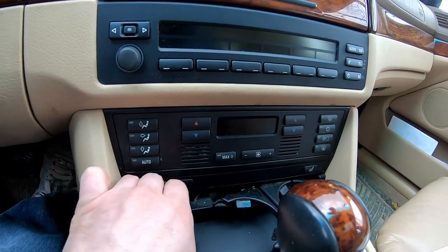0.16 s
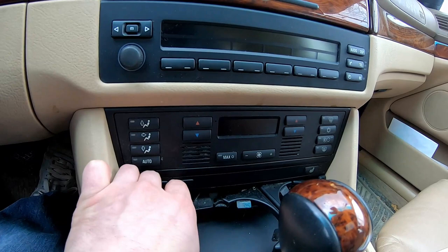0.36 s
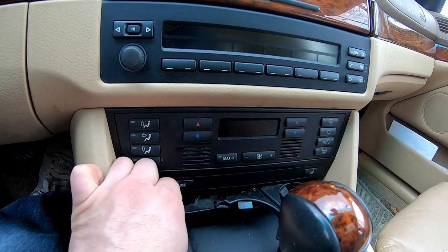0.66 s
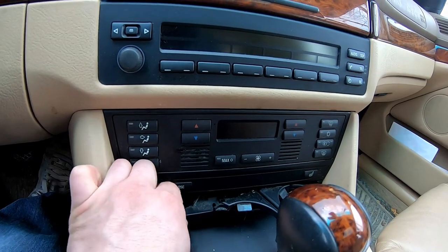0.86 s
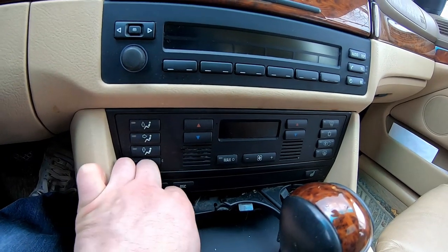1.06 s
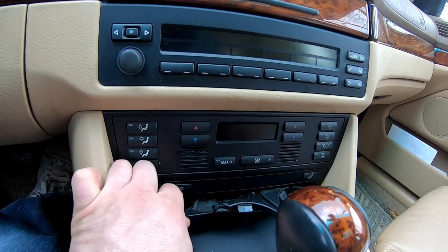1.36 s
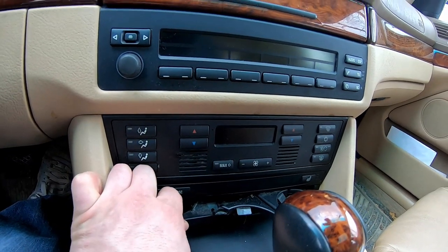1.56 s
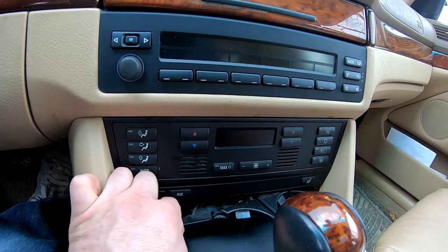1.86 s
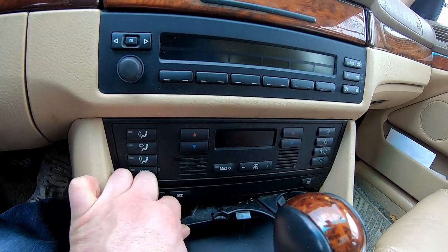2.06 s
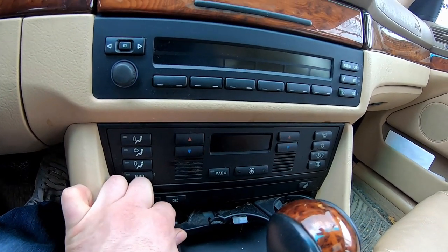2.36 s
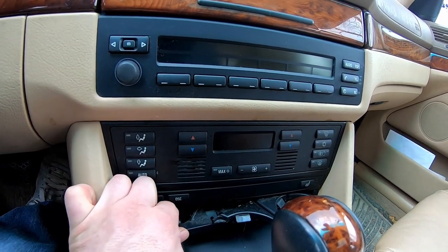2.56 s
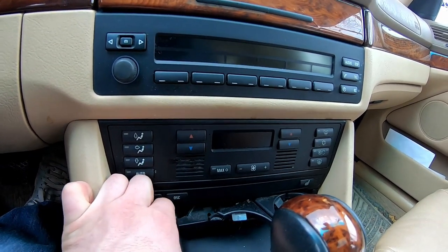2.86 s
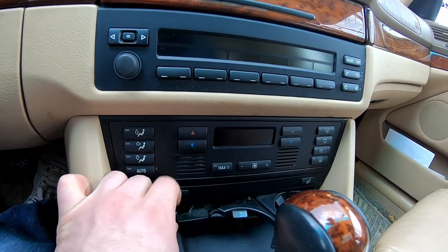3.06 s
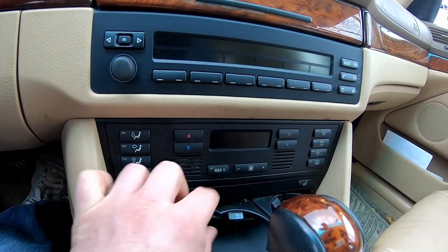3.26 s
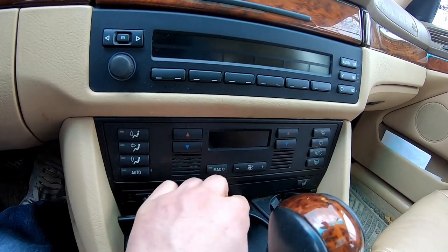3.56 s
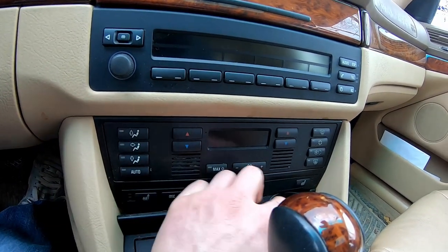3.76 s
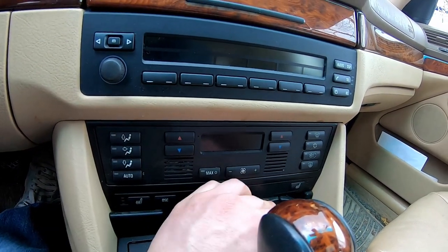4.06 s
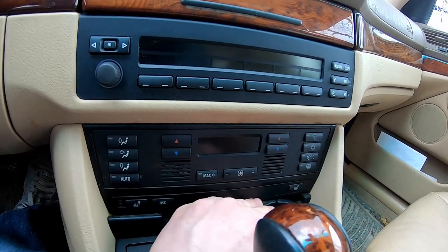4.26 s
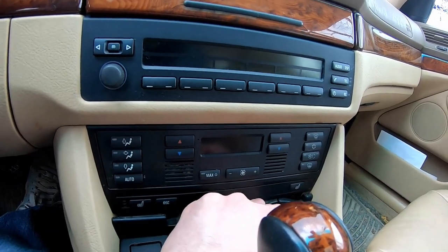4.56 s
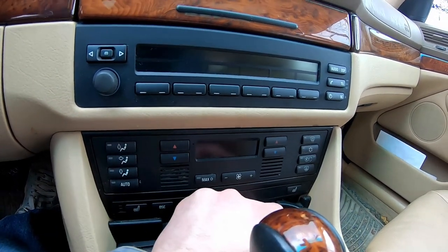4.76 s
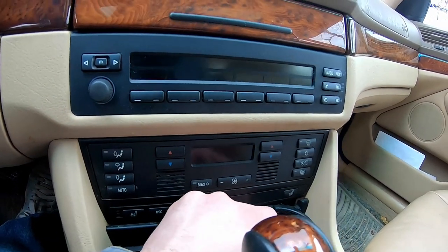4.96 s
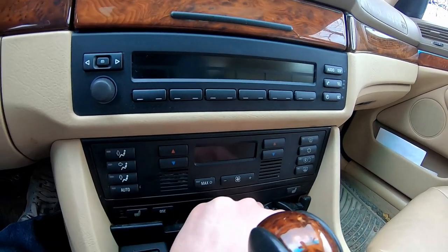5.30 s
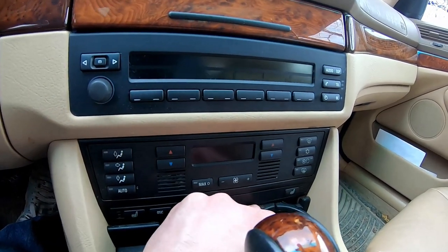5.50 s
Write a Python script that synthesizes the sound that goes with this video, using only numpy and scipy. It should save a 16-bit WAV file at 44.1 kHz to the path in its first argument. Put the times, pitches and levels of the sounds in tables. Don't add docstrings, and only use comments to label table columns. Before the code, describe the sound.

Inside a quiet parked car, a hand works a stiff plastic console panel loose. Sharp cracks come at about 0.7, 2, 2.9 and 4.4 seconds, with smaller clicks, scrapes and hollow low knocks between. Skin rubs softly on textured plastic, strongest from about 3 seconds. A small handheld camera half a metre away picks up everything close and dry, with low handling rumble.

```python
import sys
import numpy as np
from scipy import signal
from scipy.fft import rfft, irfft, next_fast_len
from scipy.io import wavfile
from scipy.ndimage import uniform_filter1d

SR = 44100
rng = np.random.default_rng(int(sys.argv[2]) if len(sys.argv) > 2 else 0)


def waveform_to_disk(signal):
    frames = np.transpose(np.atleast_2d(signal))
    scaled = np.clip(frames, -1, 1) * 32767
    samples = np.round(scaled).astype(np.int16)
    wavfile.write(sys.argv[1], SR, samples)


def volts_from_db(level):
    exponent = np.asarray(level, float) / 20
    return 10 ** exponent


N = 248503

# t/s, pressure as rub level/dB, slide speed as hiss level/dB re rub
RUBBING = [(0.0, -56, -18), (0.14, -62.5, -23), (0.66, -56.5, -18), (0.922, -69, -12), (1.471, -71.5, -7),
           (1.8, -71.5, -11.5), (2.039, -56.5, -28), (2.15, -69.5, -14), (2.791, -79.5, -2),
           (3.0, -63.5, -17.5), (3.37, -65.5, -7.5), (3.64, -55.5, -7.5), (4.2, -60, -8),
           (4.309, -67.5, -12.5), (5.06, -63.5, -10), (5.3, -61.5, -13.5), (5.44, -64.5, -10),
           (5.56, -61.5, -13.5)]
# f/Hz, level/dB per Hz
RUB_COLOUR = [(250, -39.5), (420, -1), (600, -8.5), (936, -1.5), (1020, -9), (1290, -2.5), (1890, -6),
              (2550, -5.5), (3600, -7), (5300, -15), (6500, -32.5), (13200, -69.5)]
HISS_COLOUR = [(3060, -26), (5200, -4), (7340, -4.5), (8360, -0.5), (9790, -9), (10600, -13),
               (14700, -25.5), (15800, -33.5)]
# f/Hz, level/dB re sum
RUB_SPREAD = [(60, -16), (110, -15), (200, -22.5), (380, -11), (700, -4), (1290, -5.5), (2380, -5),
              (3400, -11.5), (5000, -2.5), (8120, -2), (15000, -1.5)]
# t/s, rumble level/dB
JOLTS = [(0.12, -50), (0.4, -55), (0.73, -36), (1.04, -51), (1.17, -50), (1.601, -64), (2.025, -33.5),
         (2.28, -56.5), (2.38, -54.5), (2.96, -33), (3.15, -50), (3.55, -41), (3.65, -54), (3.82, -52),
         (3.89, -49), (4.0, -46), (4.16, -42.5), (4.42, -44), (4.75, -55), (4.89, -42), (5.28, -50),
         (5.55, -56.5)]
# f/Hz, level/dB per Hz
PORT_NOISE_COLOUR = [(25, -3.5), (70, -11), (100, -18.5), (200, -11.5), (400, -23), (800, -17.5),
                     (3300, -40.5), (8000, -37.5)]
# f/Hz, level/dB, t60/s
BODY = [(360, -4, 0.026), (491, -7, 0.041), (559.5, -3, 0.017), (777, -0.5, 0.03), (933.5, -2, 0.034),
        (1153, 0.5, 0.029), (1300, 0.5, 0.028)]
FACE = [(1520, -1, 0.0089), (1860, -8, 0.018), (1974, -1, 0.012), (2640, -2, 0.013), (2814, -8.5, 0.02),
        (3284, 2.5, 0.0065), (3422, 2.5, 0.0098), (3620, -2, 0.011), (4130, 1, 0.0087), (5000, -6, 0.0072),
        (5560, -6.5, 0.0038)]
EDGE = [(5680, 0.5, 0.0021), (6800, -6, 0.003), (7020, -1, 0.0078), (7470, -3, 0.0077), (8210, -5.5, 0.02),
        (8614, -7.5, 0.013), (9440, -5, 0.0019), (13100, -31.5, .003)]
# peak t/s, peak level/dB, body level/dB re peak, edge level/dB re peak, length/s
SCRAPES = [(0.008, -33, -5, -16.5, .011), (0.084, -41, -4.5, -37, .018), (0.669, -19.5, -10, -14, .04),
           (0.686, -29.5, -13, -1, .02), (0.712, -34, 6.5, -12.5, 0.032), (1.177, -41, -14, -1, .011),
           (1.856, -36, -16, -8, .035), (2.0, -34, -17, -8, .011), (2.93, -28, 4, -7, .028),
           (3.148, -42, -5, 7.5, .045), (3.187, -41, -5, -56, 0.022), (3.297, -33, -4.5, 3, .026),
           (3.518, -24.5, 4, -16, .022), (3.53, -18.5, -6.5, -15, .021), (3.785, -37.5, -11, -2, .02),
           (4.122, -15, -2.5, -12, .014), (4.162, -26.5, -6, -11.5, .015), (4.873, -30.5, 3, -11, .024),
           (5.26, -26, -7.5, -3.5, .02), (5.33, -39, 2, -4.5, 0.032), (5.428, -35, -1, -11, .037),
           (5.3, -39.5, -3.5, -0.5, .025), (5.52, -39, -1, -3, .018)]
# peak t/s, peak level/dB, brightness/dB edge over body, length/s
BRUSHES = [(0.18, -40, -13, 0.017), (0.291, -43.5, -22, 0.013), (0.383, -44.5, -7.5, .02),
           (0.743, -47, 5, 0.014), (0.798, -44.5, -16, 0.036), (1.025, -46, 10, 0.035),
           (1.138, -48, 12, 0.014), (1.431, -52.5, 1.5, .025), (1.546, -51.5, 5.5, 0.046),
           (1.733, -53, -0.5, 0.04), (1.953, -45, -36, 0.028), (1.971, -40, -27, 0.0099),
           (2.634, -59, 12.5, 0.072), (2.692, -65, 13.5, .06), (2.997, -40.5, 0, 0.014),
           (3.127, -39, 1, .022), (3.177, -38.5, 3.5, .021), (3.83, -49, 7, 0.026), (4.05, -51.5, -26, .06),
           (4.233, -47.5, 10.5, .015), (4.328, -44, 2, 0.025), (4.374, -35, -8, 0.01),
           (5.221, -44, -35, 0.017), (5.337, -49, -5, 0.006), (5.472, -40, -29, 0.014)]
# middle t/s, rms level/dB, colour f/Hz, length/s
STROKES = [(0.112, -59, 2500, 0.047), (0.43, -62, 3520, 0.057), (0.535, -62, 3270, 0.13),
           (0.698, -48, 3020, 0.11), (1.3, -66.5, 6000, 0.057), (1.416, -68.5, 8400, 0.2),
           (1.542, -69, 8300, 0.13), (1.75, -70.5, 8300, 0.12), (2.028, -57, 2520, 0.086),
           (2.154, -63.5, 3320, 0.077), (2.27, -64.5, 2500, 0.046), (2.66, -69, 7980, .16),
           (2.897, -59, 3000, 0.05), (2.951, -60, 1480, .08), (3.007, -58, 1180, 0.052),
           (3.169, -53, 1470, 0.16), (3.171, -50.5, 4200, 0.096), (3.293, -45.5, 1560, 0.051),
           (3.434, -58.5, 2440, 0.13), (3.6, -56, 2200, 0.12), (3.843, -53.5, 2840, 0.1),
           (3.957, -53.5, 3470, 0.086), (4.029, -62, 1010, 0.13), (5.323, -48, 3500, 0.058),
           (5.444, -45.5, 850, 0.079), (5.511, -55, 2570, 0.069), (5.601, -52, 2320, .14)]
# middle t/s, rms level/dB, colour f/Hz, length/s
DRAGS = [(0.1, -55, 226, 0.064), (0.24, -52, 220, 0.084), (0.44, -56, 222, 0.075), (1.029, -51, 249, 0.084),
         (2.17, -49, 225, .14), (2.472, -66, 199, .1), (3.65, -48, 225, .12), (3.85, -49, 227, 0.13),
         (4.05, -56, 196, .1), (5.15, -61, 222, 0.15), (5.601, -67, 236, 0.088), (1.45, -74, 10970, 0.29),
         (3.299, -53, 11380, 0.09), (5.541, -54, 1730, .1), (4.795, -58.5, 2600, .09),
         (0.666, -37, 4200, .04)]
# t/s, peak level/dB, body level/dB re peak, edge level/dB re peak
SNAPS = [(0.187, -29, 0.5, -17), (0.471, -35, -0.5, -25), (0.726, -19, -14, -14), (1.1255, -25.5, -13, -27),
         (1.9823, -9, -1, -26.5), (2.012, -23, -66.5, -2.5), (2.039, -24, 0, -11), (2.053, -34, 3, -11),
         (2.06, -27, -25, -16), (2.311, -32.5, -19, -12), (2.9857, -29, -5, -1), (3.131, -22, -5, -12),
         (3.4859, -28, -4, -6), (3.6913, -31.5, -2, -23), (4.081, -26, -1, -14), (4.1399, -26.5, -24, -5),
         (4.1506, -24.5, -5, -16), (4.1987, -25, -4, -13), (4.382, -11.5, -14, -8.5),
         (4.4173, -21, 0.5, -12.5), (4.747, -22, -7.5, -6), (4.859, -26.5, 4, -12), (5.1007, -37, -21, 1),
         (5.4118, -25.5, 0, -12), (3.7733, -35, -30, -1.5), (5.2314, -24.5, -14, -0.5),
         (5.4917, -32, 0.5, -7)]
# t/s, peak level/dB, body level/dB re peak, edge level/dB re peak
CRACKS = [(0.087, -31.5, 2, -21), (0.6716, -8.5, -7, -20.5), (0.6735, -3.5, -12.5, -11),
          (1.168, -31, -37, -15), (1.1861, -32, -21, -50), (1.1959, -40, 3.5, -15),
          (1.8345, -16.5, -31.5, -0.5), (2.387, -40, -25, -13), (2.9107, -11.5, -2.5, -10.5),
          (2.9536, -22.5, -5, -10), (3.565, -22, -1.5, -6), (4.322, -39.5, -0.5, -10),
          (4.912, -38.5, -4, -6), (5.241, -24.5, 8, -23)]
# t/s, peak level/dB, brightness/dB edge over body
TICKS = [(0.166, -48, -17), (0.328, -40.5, -6), (0.896, -47.5, -3), (1.01, -42.5, 7.5), (1.051, -42, -1),
         (1.104, -40, -13), (1.241, -45, -32), (1.565, -43, -61), (1.717, -44.5, -24), (1.937, -39, -4),
         (2.234, -52.5, -11), (2.358, -48.5, -55), (3.278, -37, 0), (2.468, -50, -0.5), (2.61, -47, -1),
         (4.573, -48.5, -7), (4.991, -43.5, -17), (5.072, -49.5, -23)]
# t/s, peak level/dB, f/Hz, decay/s
PINGS = [(0.089, -44.5, 895, 0.0036), (0.187, -34.5, 1520, 0.0055), (0.292, -42, 2480, 0.0047),
         (0.329, -49, 1280, .008), (0.369, -50, 2360, .004), (0.381, -47.5, 1440, .005),
         (0.471, -43.5, 1550, 0.0036), (0.725, -31, 865, 0.0055), (0.78, -50, 750, 0.0049),
         (1.565, -48, 1150, 0.0055), (1.533, -57, 1237, 0.0072), (1.716, -46, 1390, 0.0052),
         (2.055, -28.5, 1242, 0.006), (2.234, -56, 1890, 0.0054), (2.245, -55, 1360, .006),
         (2.311, -44.5, 1200, 0.0061), (2.387, -54, 2090, 0.0043), (2.441, -53, 2140, 0.0056),
         (2.469, -59, 1242, 0.0051), (2.872, -64, 883, 0.015), (2.95, -36.5, 524, 0.0072),
         (2.992, -40, 2700, 0.003), (3.127, -35, 1700, 0.007), (3.487, -38, 4020, 0.0045),
         (3.688, -39, 1255, 0.0036), (3.698, -40, 3770, 0.0031), (3.774, -38.5, 4580, 0.0034),
         (3.832, -42, 938, 0.013), (4.012, -47, 910, 0.013), (4.039, -43, 3460, 0.0074),
         (4.068, -43, 1280, .005), (4.553, -64, 754, 0.0052), (4.729, -50, 1740, 0.0088),
         (4.966, -51.5, 924, 0.0055), (5.23, -33, 3430, 0.0054), (5.275, -46, 844, 0.0079),
         (5.303, -37.5, 850, 0.0064), (5.319, -37, 837, 0.007), (5.418, -32, 880, 0.004),
         (5.466, -51, 3570, 0.0035), (5.492, -41.5, 2590, .008), (5.553, -48, 2520, 0.0046)]
# t/s, peak level/dB, f/Hz, decay/s
STRIKES = [(0.6722, -15, 1720, 0.003), (0.674, -12, 3330, 0.0038), (0.709, -36, 1250, .004),
           (0.7265, -19.5, 2270, 0.0025), (1.1252, -38, 3060, 0.0023), (1.17, -33.5, 2170, .004),
           (1.187, -32, 2250, 0.0026), (1.9825, -10.5, 3720, 0.001), (1.983, -22, 4740, 0.0016),
           (1.985, -14.5, 1120, 0.0041), (2.0132, -30, 5000, 0.0018), (2.0394, -24, 4200, .002),
           (2.04, -35, 1290, .004), (2.054, -34.5, 1290, 0.0069), (4.151, -23, 3200, .005),
           (2.9104, -13.5, 3600, 0.0031), (2.912, -27, 1170, 0.0033), (2.914, -19.5, 2340, 0.0028),
           (2.913, -25.5, 530, 0.0068), (2.9865, -22.5, 5140, 0.0022), (4.121, -22, 707, 0.0061),
           (4.123, -17, 3400, 0.002), (4.159, -20.5, 1220, 0.0025), (4.383, -17, 1890, 0.0051),
           (4.386, -17, 3320, 0.0024), (4.385, -20.5, 980, 0.0045), (5.1017, -36, 3380, 0.0025),
           (5.243, -20.5, 3500, 0.0016), (5.246, -30.5, 1200, 0.0047), (5.256, -35, 2500, .006)]
# t/s, peak level/dB, pitch f/Hz, deep cavity level/dB re peak
BOOMS = [(0.092, -37.5, 212, -16), (0.185, -39, 242, -5), (0.386, -42.5, 216, -8), (0.564, -38.5, 208, -3),
         (0.669, -26, 300, -2), (0.6876, -13, 241.3, -11), (0.71, -26.5, 199, -8), (0.743, -37, 196, -4),
         (1.128, -37, 200, -4), (1.196, -43, 280, -12), (1.572, -41, 230, -15.5), (1.842, -44.5, 237, -34),
         (1.985, -21, 227, -9), (2.003, -28, 197, -4.5), (2.049, -37.5, 233, -5.5), (2.91, -25, 269, -22),
         (2.94, -28.5, 227, -12), (2.991, -35, 232, -2), (3.13, -37, 235, -12), (3.479, -42.5, 180, -7),
         (3.537, -30, 249, -31), (3.786, -42.5, 238, -15), (4.119, -24.5, 203, -5), (4.168, -32.5, 233, -4),
         (4.387, -39, 235, -1.5), (4.753, -34.5, 256, -25), (4.868, -36, 229, -12), (5.245, -31, 220, -9),
         (5.343, -41, 200, -11), (5.47, -42, 218, -38)]
# t/s, peak level/dB, pitch f/Hz, deep cavity level/dB re peak
KNOCKS = [
    (1.5638, -37.5, 616, -27.5),
    (2.125, -41, 380, -1),
    (2.346, -49, 398, -26),
]
# t/s, peak level/dB
NUDGES = [(0.291, -49), (0.501, -44.5), (0.994, -51.5), (1.267, -49), (1.709, -50), (2.188, -50.5),
          (2.388, -54.5), (2.624, -57), (3.3, -47), (3.62, -41), (3.902, -64), (4.053, -47), (4.469, -51),
          (2.721, -68.5), (5.09, -48)]
# start t/s, end t/s, rms level/dB
BUZZES = [
    (0.708, 0.734, -57),
    (2.039, 2.121, -51.5),
    (2.135, 2.181, -60.5),
]
# f/Hz, level/dB, t60/s
CATCH_MODES = [(680, -8, 0.014), (1150, -5, 0.016), (1300, -8.5, 0.028)]
# f/Hz, level/dB re sum
BLOW_SPREAD = [(60, -17.5), (110, -23.5), (200, -34), (380, -16), (700, -7.5), (1290, -7), (2380, -5),
               (3400, -10.5), (5000, -4.5), (8120, 1), (15000, -2)]

TOP_HZ = 15800


def shaped(points, size):
    hz, value = np.transpose(points)
    return np.interp(np.log(np.fft.rfftfreq(size, 1 / SR) + 1), np.log(hz), value)


def colour(x, points):
    size = next_fast_len(N)
    return irfft(rfft(x, size) * volts_from_db(shaped(points, size)), size)[..., :N]


def band(x, lo_hz, hi_hz):
    return signal.sosfilt(signal.butter(2, [lo_hz, hi_hz], "bandpass", fs=SR, output="sos"), x)


def unit(x):
    return x / np.sqrt(np.mean(x ** 2))


def walk(rate):
    hold = int(SR / rate)
    levels = rng.standard_normal(N // hold + 1)
    return uniform_filter1d(np.repeat(levels, hold), hold)[:N]


def add(out, s, sound):
    i = max(int(s * SR), 0)
    out[i:i + len(sound)] += sound[:N - i]


def friction(surface, rate, grain_db, flicker_db, split_hz):
    sizes = volts_from_db(grain_db * np.minimum(rng.exponential(size=N), 3.5))
    ticks = (rng.random(N) < rate / SR) * sizes * rng.standard_normal(N)
    raw = 0.32 * unit(ticks) + rng.standard_normal((2, N))
    both = np.array([colour(v, surface) for v in raw])
    dull = signal.sosfilt(signal.butter(1, split_hz, fs=SR, output="sos"), both)
    bright = both - dull
    return unit(dull * volts_from_db(flicker_db * walk(30)) + bright * volts_from_db(flicker_db * walk(45)))


def console_hum(rub_db, slide_db):
    hum_db = rub_db - 4 - 0.4 * slide_db
    noise = band(band(rng.standard_normal((2, N)), 140, 300), 120, 310)
    return unit(noise) * volts_from_db(hum_db + 4.0 + 1.9 * walk(12))


def rubbing():
    s, *columns = np.transpose(RUBBING)
    t = np.arange(N) / SR
    rub_db, slide_db = (np.interp(t, s, c) for c in columns)
    rub = friction(RUB_COLOUR, rate=4700.0, grain_db=3.5, flicker_db=3.0, split_hz=1200)
    hiss = friction(HISS_COLOUR, rate=2100.0, grain_db=6.0, flicker_db=3.5, split_hz=11000)
    rub = rub * volts_from_db(rub_db + 3.5)
    hiss = hiss * volts_from_db(rub_db + slide_db + 7.5)
    mid, side = rub + hiss + console_hum(rub_db, slide_db)
    return np.array([mid, colour(side, RUB_SPREAD)])


def camera_rumble():
    t = np.arange(N) / SR
    rise_db_s, fall_db_s, still_db = 245.5, 173.5, -71
    jolts_db = [db - np.maximum(rise_db_s * (at - t), fall_db_s * (t - at)) for at, db in JOLTS]
    rumble_db = np.max(jolts_db, axis=0).clip(still_db)
    sway = band(band(rng.standard_normal(N), 26, 80), 26, 76)
    steady = unit(sway / uniform_filter1d(np.abs(sway), size=1800))
    rumble = steady * volts_from_db(rumble_db - 0.5)
    shake = 0.05 * np.roll(rumble, 1500)
    return np.array([rumble, shake])


def port_noise():
    noise = unit(colour(rng.standard_normal(N), PORT_NOISE_COLOUR))
    return volts_from_db(-69 + 3.0 * walk(8)) * noise


def ring(modes, t, luck, tilt_db=0., scatter_db=2.5, detune=0.043, crack=1.9):
    hz, db, t60 = np.transpose(modes)[:, :, None]
    share, shift = luck[:2 * len(modes)].reshape(2, -1, 1)
    db = db + scatter_db * share + tilt_db * np.log2(hz / np.median(hz))
    decay = np.exp(-np.log(1000) * t / t60)
    sign = (-1.) ** np.arange(len(modes))[:, None]
    tone = np.sin(2 * np.pi * hz * (1 + detune * shift) * t)
    return np.sum(sign * volts_from_db(db) * (decay + crack * decay ** 4) * tone, axis=0)


def panel(out, s, push, levels_db, luck, air_db):
    t = np.arange(2048) / SR
    body_db, face_db, edge_db = levels_db
    hardness = edge_db - body_db + 11.5
    for modes, db, chance, sign in zip((BODY, FACE, EDGE), levels_db, luck, (1, -1, 1)):
        sound = signal.fftconvolve(push, ring(modes, t, chance, tilt_db=0.24 * hardness))
        add(out, s, sign * volts_from_db(db) * sound / np.abs(sound).max())
    contact = band(band(push, 1250, 5000), 900, 7400)
    add(out, s, volts_from_db(face_db - 2.5) * contact / np.abs(contact).max())
    air = band(push, 3300, 14000)
    add(out, s, volts_from_db(edge_db + air_db) * air / np.abs(air).max())


def faint(s, db, bright_db, *rest):
    return (s, db, -3 - 0.2 * bright_db, -4 + bright_db, *rest)


def scrapes():
    out, t = np.zeros(N), np.arange(5000) / SR
    for s, db, body_db, edge_db, length in SCRAPES + [faint(*row) for row in BRUSHES]:
        luck = 1.43 * rng.standard_normal((3, 36))
        slips = rng.random(len(t)) < 1800 / SR
        rise = np.clip(0.75 * length, .003, min(s, .04))
        fade = np.clip(0.38 * length, .002, .025)
        force = np.where(t < rise, (t / rise) ** 1.6, np.exp(-(t - rise) / fade))
        push = force * rng.standard_normal(len(t)) * (slips + 0.33)
        panel(out, s - rise, push, db + np.array([body_db, 0, edge_db]), luck, air_db=-6.5)
    return out


def strokes():
    out = np.zeros(N)
    octaves = 0.48
    for s, db, hz, length in STROKES + DRAGS:
        noise, grain = rng.standard_normal((2, 12000))
        size = min(int(length * SR), len(noise))
        rough = band(noise * volts_from_db(4.1 * grain), hz * 2 ** -octaves, min(hz * 2 ** octaves, TOP_HZ))
        add(out, s - size / SR / 2, volts_from_db(db) * np.hanning(size) * unit(rough[:size]))
    return out


def snaps():
    out, t = np.zeros(N), np.arange(2048) / SR
    snap_s, crack_s, tick_s = 0.0056, 0.0029, 0.0064
    rows = [(*row, snap_s) for row in SNAPS]
    rows += [(*row, crack_s) for row in CRACKS]
    rows += [faint(*row, tick_s) for row in TICKS]
    for s, db, body_db, edge_db, chatter in rows:
        luck = rng.standard_normal((3, 36))
        slips = rng.random(len(t)) < 3500 / SR
        force = (1 - np.exp(-t / 0.00016)) * np.exp(-t / chatter)
        break_pulse = 0.78 * np.exp(-((t - .0006) / 6e-5) ** 2)
        push = force * rng.standard_normal(len(t)) * (slips + 0.3) + break_pulse
        panel(out, s - .0004, push, db - 3.5 + np.array([body_db, 0, edge_db]), luck, air_db=-23.5)
    return out


def pings():
    out, t = np.zeros(N), np.arange(4096) / SR
    for rows, octaves in ((PINGS, 0.1), (STRIKES, 0.24)):
        for s, db, hz, decay in rows:
            burst = (rng.standard_normal(len(t)) + 6.9 * (t == 0)) * np.exp(-t / max(decay, .001))
            sound = band(burst, hz * 2 ** -octaves, hz * 2 ** octaves)
            add(out, s - .0005, volts_from_db(db) * sound / np.abs(sound).max())
    return out


def booms():
    out, t = np.zeros(N), np.arange(8192) / SR
    cavity_hz = 126
    rows = [(*row, 10.3 / row[2]) for row in BOOMS]
    rows += [(*row, 6.5 / row[2]) for row in KNOCKS]
    rows += [(*row, 212.6, -14, 0.062) for row in NUDGES]
    for s, db, hz, deep_db, t60 in rows:
        a, b, phase = rng.standard_normal(3)
        swell = (1 - np.exp(-t / 0.0031)) * np.exp(-np.log(1000) * (t / t60) ** 1.46)
        wall = np.sin(2 * np.pi * hz * t)
        wall += 0.29 * np.sin(2 * np.pi * hz * (1.45 + 0.04 * a) * t + phase)
        slow = (1 - np.exp(-t / 0.013)) * np.exp(-np.log(1000) * t / (2.3 * t60))
        deep = np.sin(2 * np.pi * cavity_hz * (1 + 0.14 * b) * t)
        deep += 0.23 * np.sin(2 * np.pi * .6 * cavity_hz * (1 + 0.13 * a) * t)
        wall_sound = swell * wall / swell.max() / 0.83
        cavity_sound = volts_from_db(deep_db) * slow * deep / slow.max()
        add(out, s, volts_from_db(db + 1.0) * (wall_sound + cavity_sound))
    return out


def buzz():
    out = np.zeros(N)
    modes = ring(CATCH_MODES, np.arange(2048) / SR, np.full(6, .1))
    for start, end, db in BUZZES:
        fade = np.geomspace(1, .4, int((end - start) * SR))
        hits = rng.random(len(fade)) < 700 / SR
        taps = fade * rng.standard_normal(len(fade)) * hits
        add(out, start, volts_from_db(db) * unit(signal.fftconvolve(taps + 1e-9, modes)))
    return out


def cabin(x):
    t = np.arange(8192) / SR
    late, soon = rng.standard_normal((2, 8192))
    t60_s, tail_db = 0.098, -12
    tail = late * np.exp(-np.log(1000) * t / t60_s) * (t > .0012)
    tail = band(tail, 390, 9000)
    early = np.array([soon, late]) * np.exp(-t / 0.0068) * (t > .0004)
    early = early / np.linalg.norm(early[0])
    place = 2.2 * walk(12)
    paths = x * np.array([np.cos(place), np.sin(place)])
    mid = x + volts_from_db(tail_db) * signal.fftconvolve(x, tail / np.linalg.norm(tail))[:N]
    echoes = signal.fftconvolve(paths, early, axes=1).sum(axis=0)[:N]
    return np.array([mid, colour(echoes, BLOW_SPREAD)])


def scene():
    blows = scrapes() + strokes() + snaps() + pings() + booms() + buzz()
    mid, side = rubbing() + camera_rumble() + cabin(blows)
    side = side + port_noise()
    return np.array([mid + side, mid - side])


def low_pass(x):
    return signal.sosfilt(signal.butter(12, 15970, fs=SR, output="sos"), x)


def record(dry):
    limited = colour(dry, [(TOP_HZ, 0), (1.01 * TOP_HZ, -60)])
    mix = signal.sosfilt(signal.butter(2, 10200, fs=SR, output="sos"), limited)
    return low_pass(mix)


dry = scene()
out = record(dry)
waveform_to_disk(out)
```